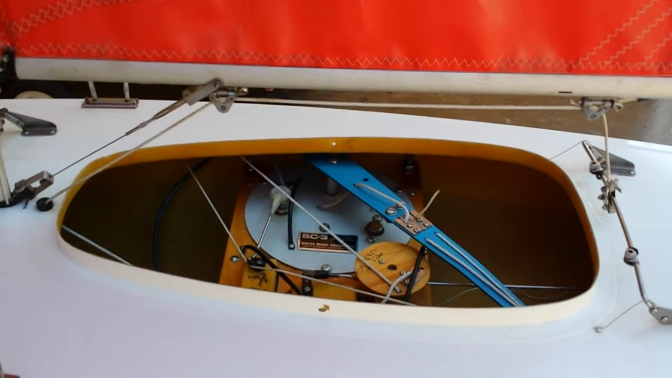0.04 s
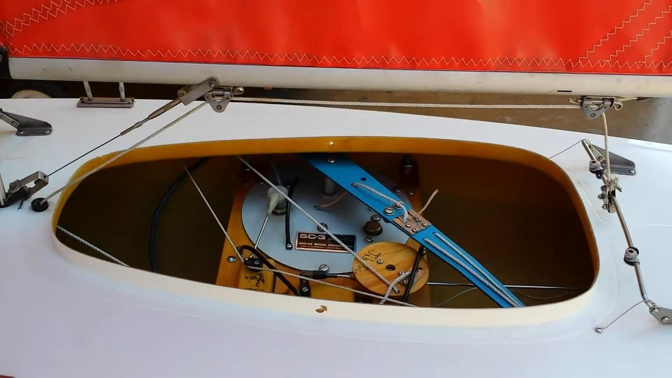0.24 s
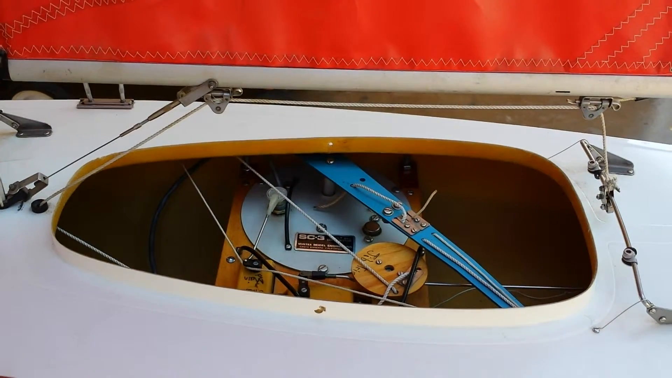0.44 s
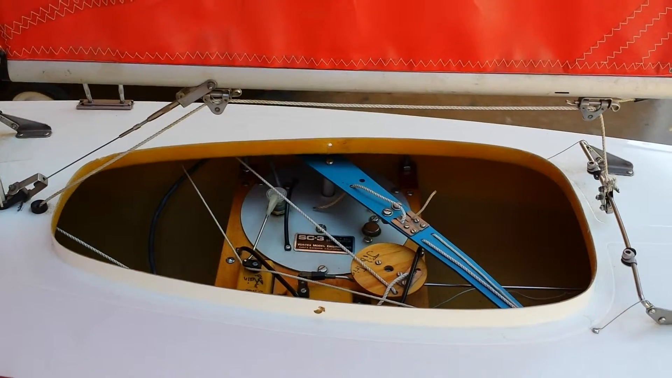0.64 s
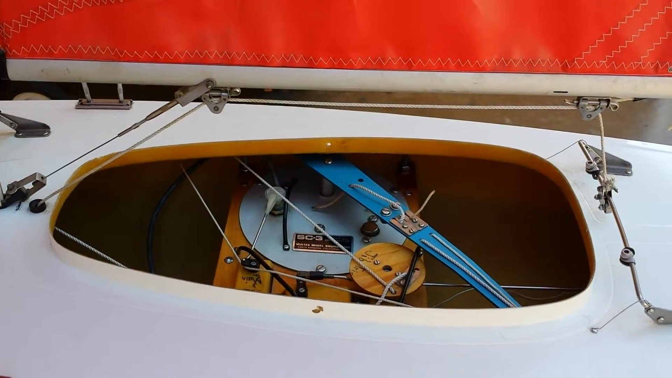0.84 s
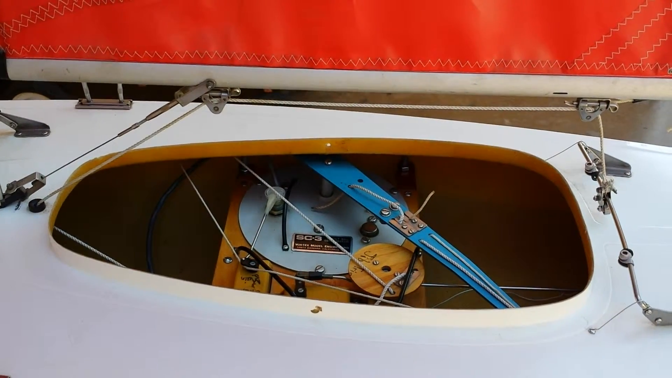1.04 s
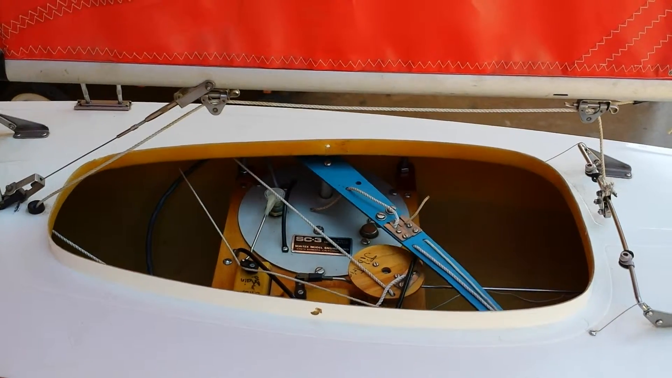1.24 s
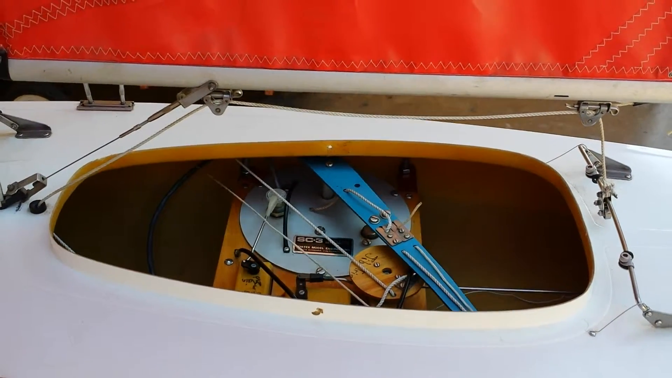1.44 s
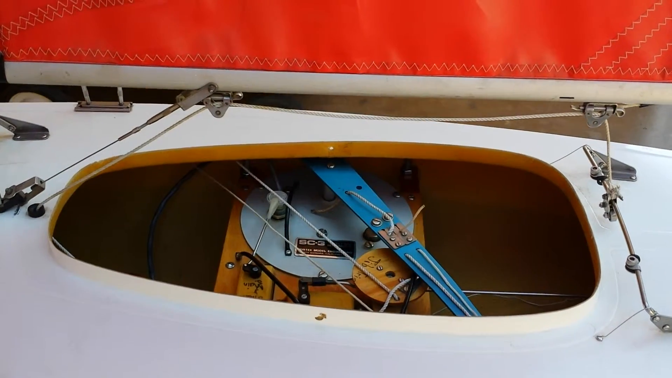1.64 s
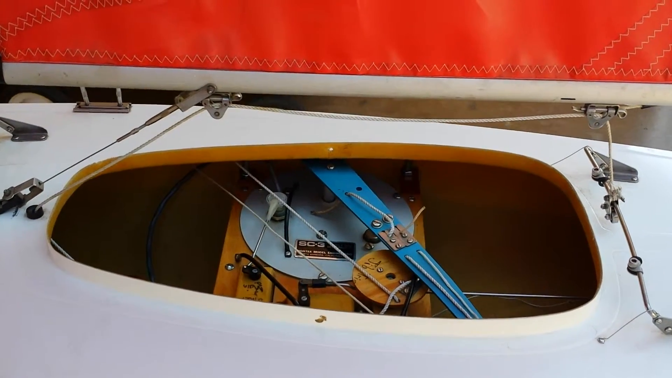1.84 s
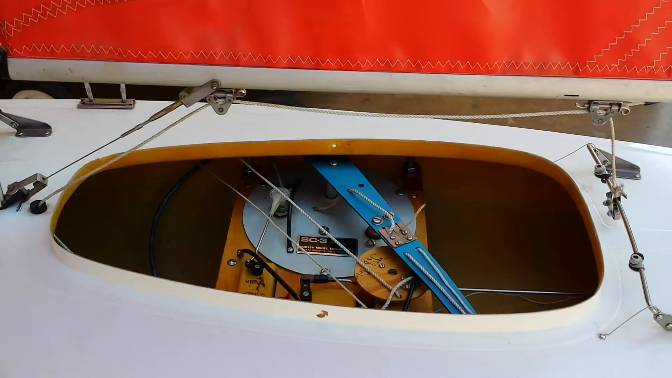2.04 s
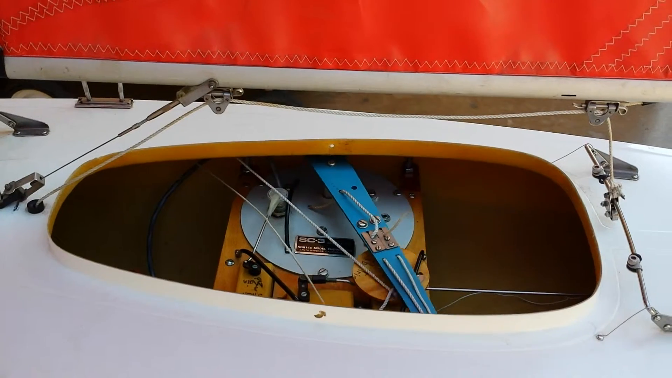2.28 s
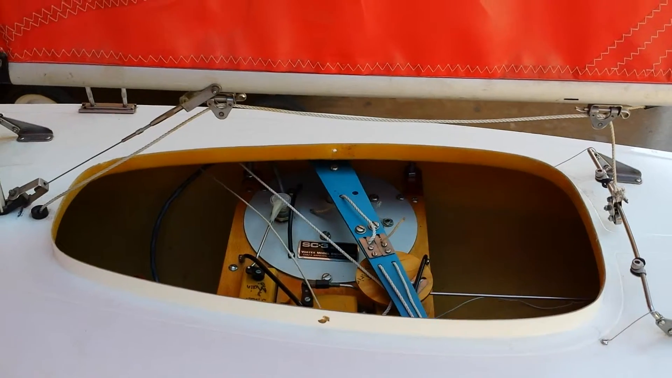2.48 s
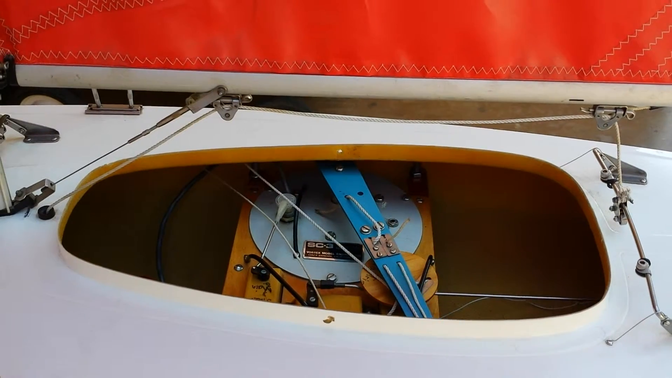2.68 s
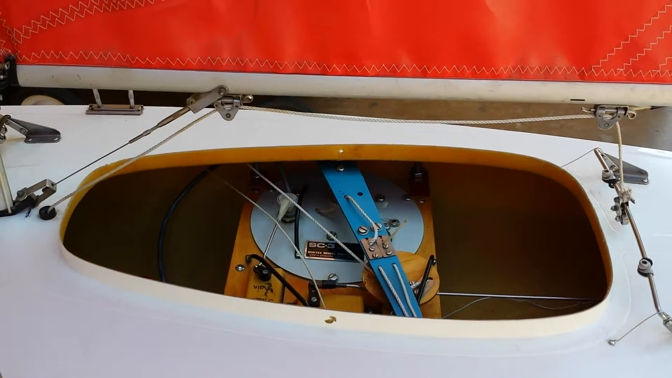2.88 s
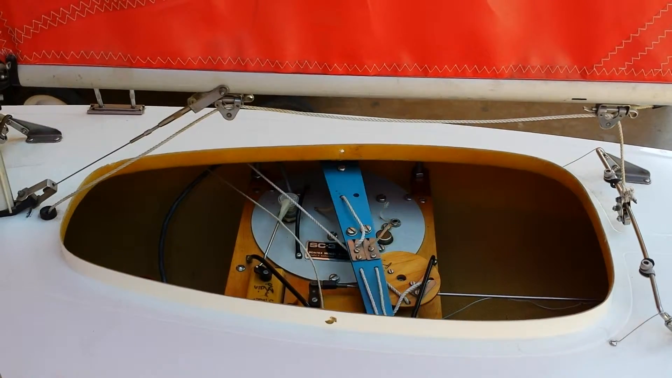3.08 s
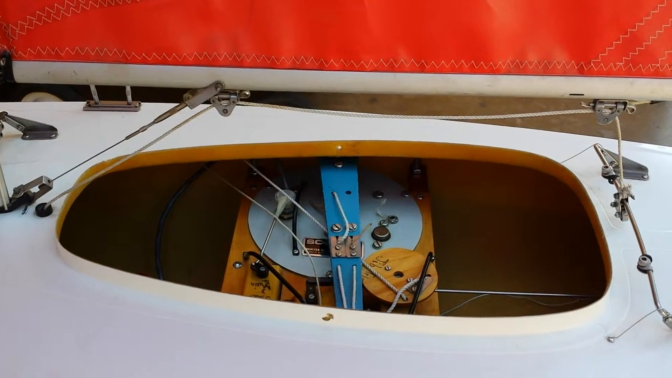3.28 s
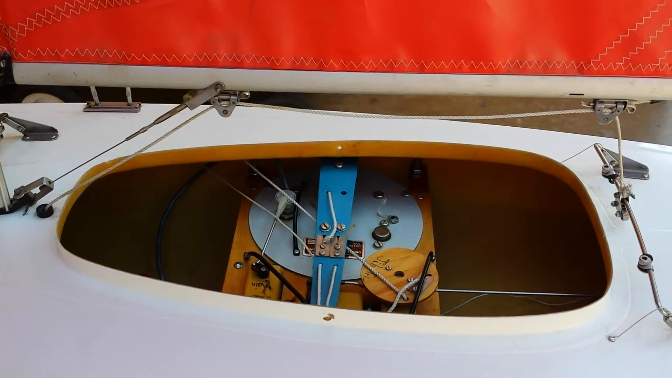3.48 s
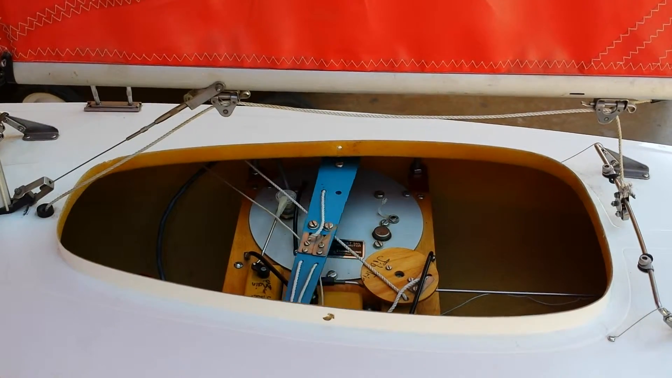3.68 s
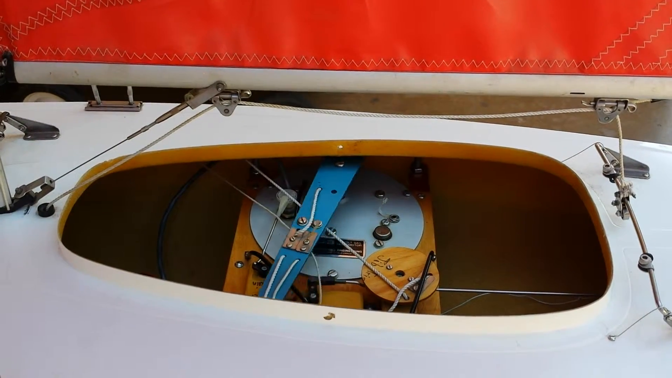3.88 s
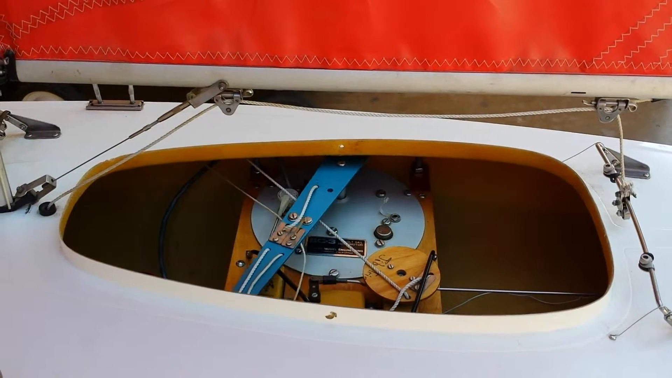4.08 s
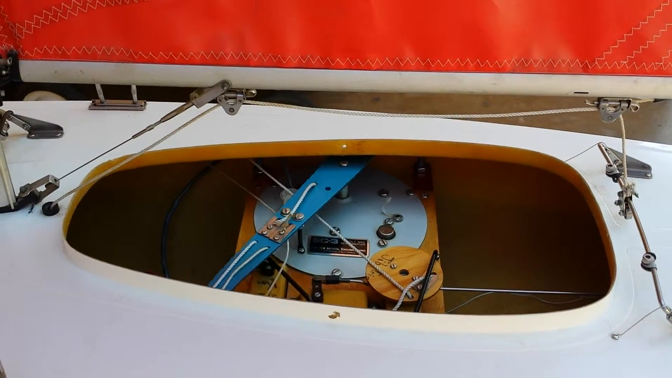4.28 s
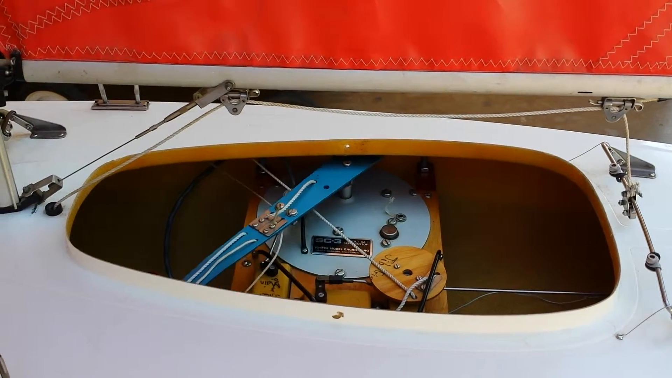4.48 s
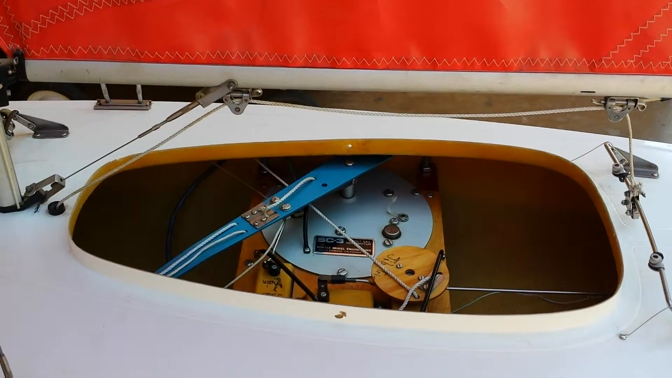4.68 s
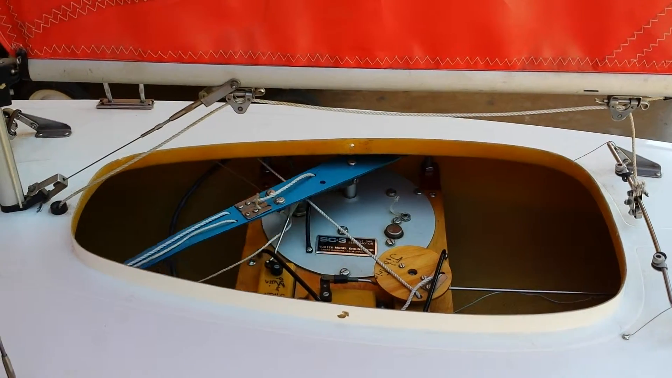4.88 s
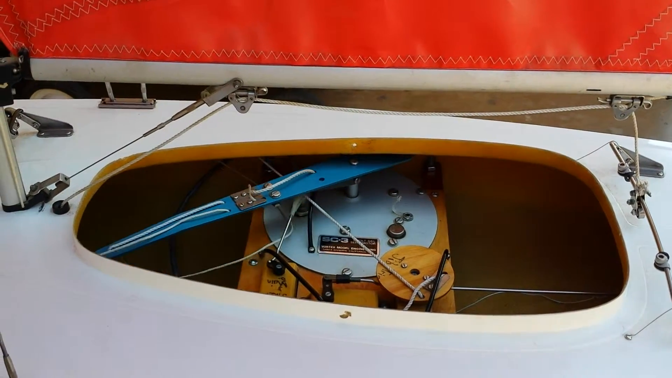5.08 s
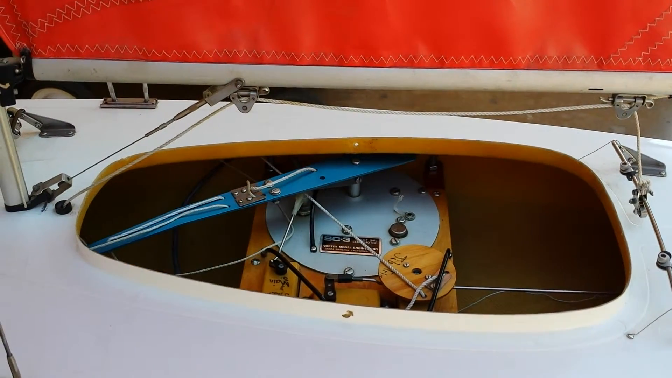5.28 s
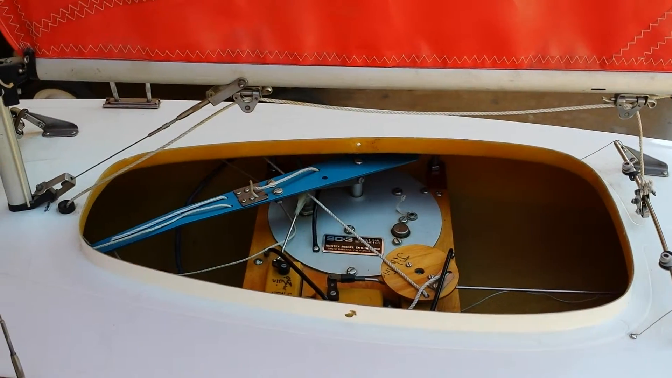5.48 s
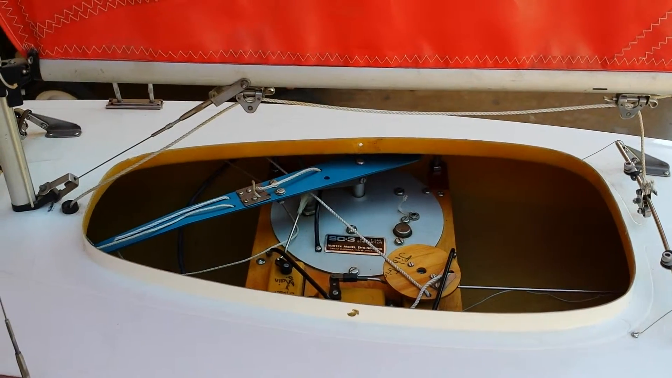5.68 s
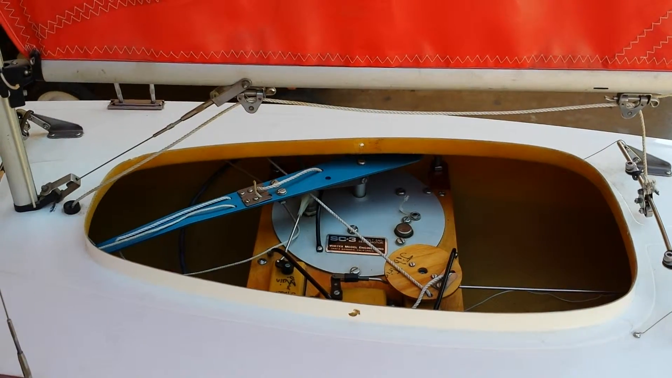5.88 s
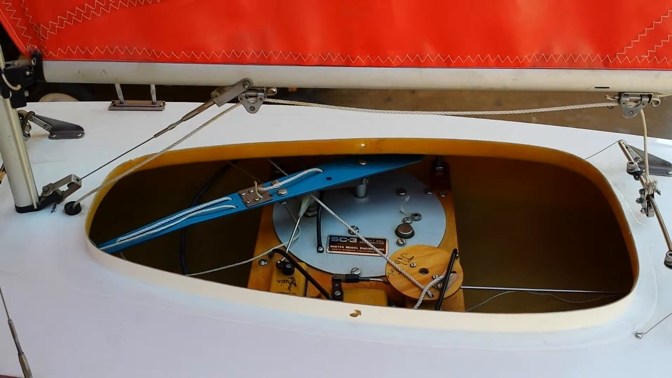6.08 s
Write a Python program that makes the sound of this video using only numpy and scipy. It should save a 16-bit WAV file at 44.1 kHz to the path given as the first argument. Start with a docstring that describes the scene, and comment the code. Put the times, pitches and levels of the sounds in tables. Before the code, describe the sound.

A small geared servo whirs in two short buzzing bursts and one long grinding run, with faint ticks and line rubbing between, in a quiet room.

```python
"""Indoors, inside a model boat, a geared servo swings the sail arm: two short runs and a long one.
Random knocks, one per gear tooth, excite the gearbox and drum on the hollow hull; the motor hums below.
Around the runs single teeth tick and the line rubs and squeaks as bands of swelling noise.
After the last run come a few short scuffs, all over a soft room murmur with a light reverberation."""
import sys
import numpy as np
from scipy import signal
from scipy.fft import rfft, irfft
from scipy.io import wavfile
from scipy.ndimage import uniform_filter1d

SR = 44100
rng = np.random.default_rng(int(sys.argv[2]) if len(sys.argv) > 2 else 0)


def persist_wave(psi):
    """Save psi, clipped to +-1, as 16-bit WAV."""
    counts = np.round(np.clip(psi, -1, 1) * 32767).astype(np.int16)
    wavfile.write(sys.argv[1], SR, np.atleast_2d(counts).T)


N = 270333
TIME = np.arange(N) / SR
FREQ = np.fft.rfftfreq(N, 1 / SR)

# Runs of the servo. Each row: gears bite in seconds, spin-up in seconds, switch-off in seconds,
# run-down in seconds, rattle in dB, tooth edges in dB above the rattle, hum in dB (all before mix trims).
RUNS = [(1.039, 0.092, 1.345, .19, -24.5, -0.4, -39), (1.976, .11, 2.305, .17, -24, 0.5, -40),
        (2.781, 0.093, 5.095, .15, -23.5, 1.0, -38.5)]
SLACK_S = 0.062  # before the gears bite, the motor turns softly through their slack for this long


def gain_of(db):
    """Decibels to gain."""
    return np.exp(np.asarray(db) * np.log(10) / 20)


def evened(x):
    """Scales to rms 1."""
    return x / np.sqrt(np.mean(x ** 2) + 1e-20)


def read(points, hz=FREQ, axis=1):
    """Reads one column of a spectrum on a log-frequency axis."""
    table = np.array(points, float)
    return np.interp(np.log(hz + 1), np.log(table[:, 0] + 1), table[:, axis])


def read_gain(points):
    """A spectrum in dB as gains."""
    return gain_of(read(points))


def level(s, db):
    """A gain curve through points in seconds and dB, silent outside its span."""
    return gain_of(np.interp(TIME, s, db, left=-150, right=-150))


def below(hz, order):
    """Low-pass gain."""
    return 1 / np.sqrt(1 + (FREQ / hz) ** (2 * order))


def above(hz, order):
    """High-pass gain."""
    return np.sqrt(1 - below(hz, order=order) ** 2)


def shaped(x, gain):
    """Filters by a gain for each frequency."""
    return irfft(rfft(x) * gain, N)


def wobble(hz):
    """A random curve of rms 1 that wanders at about this rate."""
    count = int(np.pi * hz * N / SR) + 2
    points = rng.standard_normal(count)
    return evened(np.interp(TIME, np.linspace(0, N / SR, count), points))


def swell(s, half):
    """A stroke that swells to its middle and dies away again."""
    return 1 / (1 + .5 * ((TIME - s) / half) ** 2) ** 4


def scatter(strength):
    """Countless tiny contacts of a given strength, reaching both sides: alike in the bass, diffuse in the treble."""
    # Likeness of the two sides, before the bass is drawn together. Each row: frequency in Hz, likeness 0-1.
    likeness = [(100, 0.74), (350, 0.97), (600, 0.65), (800, 0.86), (1400, 0.73), (2100, 0.3), (2550, 0.56),
                (3100, 0.39), (7500, 0.37), (9000, 0.28), (14000, .15)]
    # Lead of the left side, before the bass is drawn together. Each row: frequency in Hz, phase in radians.
    lead = [(100, 0), (1300, .15), (1750, -.8), (2600, -.9), (3500, -2.7), (4200, -2.7), (4450, -.1),
            (5050, -.1), (5600, -2.6), (6200, -.8), (7300, -2.8), (8100, -.7), (8800, -.4), (9200, -2.2),
            (10700, .3), (12000, -1.5)]
    near, far = rfft(strength * rng.standard_normal((2, N)))
    apart = above(450, order=3)
    same = 1 - apart * (1 - np.clip(read(likeness), 0, 1))
    right = same * near + np.sqrt(1 - same ** 2) * far
    right = right * np.exp(-1j * apart * read(lead))
    return irfft(np.array([near, right]), N)


def room_noise():
    """Murmur of air and distant machines: low coloured noise whose level drifts and wavers."""
    # Colour of the murmur. Each row: frequency in Hz, relative level in dB.
    colour = [(12, -37), (20, -8.5), (42, -15), (116, 3), (185, -5.5), (491, -12), (565, -14),
              (1010, -15.5), (1200, -23), (2030, -24.5), (2400, -28.5), (4310, -29.5), (6910, -30),
              (14300, -35.5), (15500, -37)]
    # Course of the murmur, before it wavers. Each row: time in seconds, level in dB.
    course = [(0, -51), (1.0, -52), (2.6, -52.5), (5.3, -57), (6.13, -59)]
    air = evened(shaped(scatter(1), read_gain(colour)))
    wavering = gain_of(.9 * wobble(4.4))
    return air * level(*np.transpose(course)) * wavering * gain_of([[.5], [-.5]])


def reverberation(x):
    """A diffuse half-second noise tail that decays at its own rate in each band, fastest near 5 kHz."""
    # Decay of the room. Each row: frequency in Hz, time to fall by 60 dB in seconds.
    decay = [(100, 0.37), (1000, 0.58), (5000, 0.083), (14000, 0.31)]
    hz, t, noise = signal.stft(rng.standard_normal((2, SR // 2)), SR, nperseg=256)
    fading = gain_of(-60 * t / read(decay, hz)[:, None])
    late = t > .005  # leaves out the direct sound
    tail = signal.istft(noise * fading * late, SR, nperseg=256)[1]
    return signal.fftconvolve(x, tail / np.linalg.norm(tail[0]), axes=1)[:, :N]


def rubbing(grain_db):
    """Fibres of the line catch and slip: a grainy rasp, each stroke with its own share of treble hiss."""
    # Strokes over deck and rigging. Each row: middle in seconds, half length in seconds,
    # relative level in dB, gain of the treble hiss in dB.
    strokes = [(0.08, .018, -59, -19), (0.248, 0.017, -47, -16), (0.301, 0.018, -45.5, -13),
               (0.383, .022, -51, -24), (0.553, 0.037, -61, 4), (.645, 0.034, -45.5, -11),
               (0.763, 0.028, -60.5, 3), (1.57, 0.051, -63, 7.5), (1.78, .015, -55, 1.5),
               (2.686, 0.068, -56.5, -4.5), (5.518, .058, -46.5, 1), (5.769, 0.037, -44, -7.5),
               (5.822, 0.041, -41, -2), (5.903, 0.017, -48.5, -11), (6.047, .018, -58.5, -2)]
    # Colour of the rasp. Each row: frequency in Hz, relative level in dB.
    colour = [(150, -20), (280, 0), (600, -6), (1100, -8), (1450, -3), (1900, -2), (2450, -6), (3000, -5),
              (3700, -6), (4900, -3.5), (6900, -1), (8500, -15.5), (11000, -23), (15000, -45.5)]
    rasp = scatter(gain_of(grain_db * wobble(250)))
    rasp = evened(shaped(rasp, read_gain(colour)))
    dull = shaped(rasp, below(3100, order=6) ** 2)
    hiss = rasp - dull
    # the taut line keeps rasping faintly and unevenly for the first two seconds
    creep = gain_of(-65 + 3.5 * wobble(12)) * (TIME < 2)
    dull_gain, hiss_gain = creep, creep * gain_of(-14.5)
    for s, half, db, hiss_db in strokes:
        stroke = swell(s, half)
        dull_gain = dull_gain + gain_of(db) * stroke
        hiss_gain = hiss_gain + gain_of(db + hiss_db) * stroke
    return (dull * dull_gain + hiss * hiss_gain) * gain_of([[5.5], [2]])


def squeaks(hz):
    """The line sticks and slips in an eyelet, which rings faintly in one band."""
    # Squeaks. Each row: middle in seconds, half length in seconds, relative level in dB.
    strokes = [(0.299, 0.011, -47), (0.64, 0.033, -54), (1.662, 0.0089, -47), (2.68, 0.031, -59),
               (5.523, 0.042, -46.5)]
    band = 1 / (1 + ((FREQ - hz) / 300) ** 2) ** 2
    ring = evened(shaped(scatter(1), band))
    strength = sum(gain_of(db) * swell(s, half) for s, half, db in strokes)
    return ring * strength * gain_of([[2], [-1]])


def ticks(ring_s, tick_db):
    """A tooth drops into the play of the next one: a short plastic click of decaying noise."""
    # Single teeth slipping. Each row: time in seconds, relative level in dB.
    slips = [(0.4475, -39.5), (0.5163, -40), (0.5324, -38.5), (0.5714, -40), (0.6005, -43), (0.621, -42),
             (0.7907, -41.5), (0.834, -42), (0.902, -41), (0.929, -44), (1.549, -38), (1.5767, -42),
             (1.6317, -43), (1.659, -40.5), (1.715, -44), (1.7549, -44), (1.865, -42), (2.596, -45.5),
             (5.4075, -43.5), (5.7023, -47.5), (6.0327, -48)]
    # Colour of the click. Each row: frequency in Hz, relative level in dB.
    colour = [(300, -26.5), (1200, -5), (2500, 2), (3500, -4.5), (4800, -2), (7200, 1), (9500, -17),
              (15000, -33)]
    s, db = np.transpose(slips)
    blows = np.bincount(np.round(s * SR).astype(int), gain_of(db + tick_db), N)
    force = signal.lfilter([1], [1, -np.exp(-1 / (ring_s * SR))], blows + 1e-12)
    return shaped(scatter(force), evened(read_gain(colour))) * gain_of([[1.2], [-1.2]])


def shaft_turns():
    """Turns of the motor shaft: it speeds up while switched on, sinks back after, and is slightly unsteady."""
    idle_hz, full_hz, speed_up_s = 101.54, 115.1, .16  # speed_up_s is a time constant
    powered = sum((TIME > bite - SLACK_S) & (TIME < off) for bite, _, off, *_ in RUNS)
    keep = np.exp(-1 / (speed_up_s * SR))
    hz = idle_hz + (full_hz - idle_hz) * signal.lfilter([1 - keep], [1, -keep], powered)
    return np.cumsum(hz * (1 + .006 * wobble(12))) / SR


def run_gain(bite, spin_s, off, down_s, shape):
    """Envelope of one run: slack, a step as the gears bite, spin-up, hold, run-down."""
    spin_curve = 1.21  # power by which the spin-up levels off
    coast_s = 0.011  # rounds the switch-off
    slack_db, bite_db, fade_db = shape
    slack = gain_of(slack_db) * np.clip((TIME - bite + SLACK_S) / 0.013, 0, 1)
    unspun = np.clip(1 - (TIME - bite) / spin_s, 0, 1)
    coasted = (np.hypot(np.maximum(TIME - off, 0), coast_s) - coast_s) / down_s
    engaged = gain_of(bite_db * unspun ** spin_curve - fade_db * coasted)
    return np.where(TIME < bite, slack, engaged)


def hum_gain():
    """Strength of the hum: faint around the early runs, building slowly in each and growing with the load."""
    # Faint hum of the idling motor. Each row: time in seconds, level in dB.
    idle = [(0, -53), (.2, -53.5), (.45, -47), (.95, -56.5), (1.58, -46), (1.9, -59), (2.5, -56),
            (2.9, -64)]
    # How the hum follows a run: dB in the slack, dB as the gears bite, dB lost over the run-down time.
    shape = (-30, -15.5, 22)
    growth_db = 2.5  # dB per second as the arm takes up load
    running = np.zeros(N)
    for bite, spin_s, off, down_s, _, _, db in RUNS:
        load_db = growth_db * (np.clip(TIME, bite, off) - bite)
        # the hum builds more slowly than the gears spin up
        running += gain_of(db + load_db) * run_gain(bite, 2.3 * spin_s, off, down_s, shape)
    return np.hypot(running, level(*np.transpose(idle)))


def motor(turns):
    """The unbalanced rotor shakes the hull once a turn; the hum flutters most when it is faint."""
    strength = hum_gain()
    flutter = .1 + .7 / (1 + (strength / gain_of(-45)) ** 2)
    unsteady = (1 + flutter * (wobble(17) + 1j * wobble(19))) / np.sqrt(1 + 2 * flutter ** 2)
    tone = (np.exp(2j * np.pi * turns) * unsteady).real
    overtone = gain_of(-20.0) * np.sin(2 * np.pi * turns * 4)
    return np.sqrt(2) * strength * (tone + overtone) * gain_of([[0], [-.6]])


def hull():
    """Response of gearbox and hull towards each side: resonant peaks over a body with roughened treble."""
    # Dense resonances between the modes. Each row: frequency in Hz, left and right relative level in dB.
    dense = [(130, -29, -30), (440, -29, -29), (700, -22, -25), (1500, -15, -23), (2100, -14, -19),
             (2700, -17, -26), (3100, -15, -20), (4700, -23, -22), (7500, -11, -17), (9000, -16, -14),
             (10600, -22, -21), (11900, -22, -19), (12800, -35, -24), (15000, -30, -30)]
    # Air and panel resonances of the hull. Each row: frequency in Hz, width in Hz before it is
    # narrowed below, left and right relative level in dB.
    hull_modes = [(134, 10, -17, -18), (171, 11, -11.5, -12.5), (205, 11, -0.5, -0.5), (241, 9, -4, -6),
                  (264, 20, 0, -2), (327, 18, -10, -11), (345, 19, -8, -9), (372, 17, -13, -12),
                  (399, 14, -10, -11), (460, 7, -16, -18), (487, 25, -18, -21), (518, 15, -21, -19),
                  (589, 36, -18, -25), (766, 42, -16, -20), (843, 39, -14, -19), (921, 31, -17, -20),
                  (1089, 35, -14, -17)]
    # Resonances of the gears and their case. Each row: as for the hull.
    gearbox_modes = [(1279, 26, -9, -20), (1380, 44, -8, -17), (1462, 88, -10, -18), (1565, 23, -13, -24),
                     (1669, 67, -6, -20), (1773, 49, -6, -15), (1896, 113, -12, -18), (2384, 93, -11, -21),
                     (2520, 107, -5, -13), (2641, 140, -17, -15), (2779, 88, -7, -19), (2900, 47, -12, -30),
                     (3350, 110, -15, -21), (4010, 140, -21, -20), (4335, 38, -23, -24),
                     (6675, 61, -17, -15), (6970, 90, -15, -16), (7240, 140, -10, -17),
                     (7487, 132, -8, -12), (7839, 35, -8, -21), (8180, 95, -11, -18), (8490, 140, -17, -10),
                     (8753, 92, -8, -6), (9011, 125, -9, -11), (9281, 52, -14, -19), (9515, 68, -22, -17),
                     (9797, 47, -17, -18), (10865, 71, -24, -23)]
    grid = np.fft.rfftfreq(32768, 1 / SR)
    # a fine random ripple roughens the treble of the response
    roughness = evened(rfft(rng.standard_normal((2, 512)), 32768).real)
    ripple = gain_of(1.5 * roughness * (grid > 3200))
    smooth = gain_of([read(dense, grid, axis=1), read(dense, grid, axis=2)])
    power = (smooth * ripple) ** 2
    for hz, width, left_db, right_db in list(hull_modes) + list(gearbox_modes):
        peak = 1 / (1 + ((grid - hz) / (.78 * width)) ** 2)
        power = power + (gain_of([[left_db], [right_db]]) * peak) ** 2
    response = np.array([np.interp(FREQ, grid, side) for side in np.sqrt(power)])
    return response * above(97, order=4)


def teeth(turns, count, spread_db, ring_s, sliding, lurch_db):
    """One knock a tooth, of random force, over steady sliding; the play in the gears makes them come in clumps."""
    meshing = np.diff(np.floor(turns * count + .3 * wobble(400)), prepend=0) > 0
    knocks = meshing * gain_of(spread_db * np.minimum(rng.standard_normal(N), 2))
    energy = signal.lfilter([1], [1, -np.exp(-2 / (ring_s * SR))], knocks ** 2)
    return np.sqrt(energy / energy.mean() + sliding) * gain_of(lurch_db * wobble(30))


def pinion(turns, hz, ring_s, spread_db):
    """About once a turn the pinion slaps across its play and rings briefly."""
    slaps = np.diff(np.floor(turns + .4 * wobble(60)), prepend=0) > 0
    force = slaps * gain_of(spread_db * np.minimum(rng.standard_normal(N), 2))
    age = TIME[:SR // 20]
    envelope = np.exp(-age / ring_s) * (1 - np.exp(-age / .0004))
    ring = np.sin(2 * np.pi * hz * age) * envelope
    return evened(signal.fftconvolve(force, ring)[:N])


def gear_gains():
    """Strength of hull drumming, rattle and tooth edges through the runs and their jolts."""
    # How each layer follows a run: dB in the slack, dB as the gears bite, dB lost over the run-down time.
    drum_shape = (-33.5, -24, 23.1)
    rattle_shape = (-22, -11, 33)
    edge_shape = (-32.5, -19.5, 51)
    # Jolts as the gears catch or stop and cross their play. Each row: start in seconds,
    # rattle in dB, tooth edges in dB above the rattle (before mix trims).
    jolts = [(1.412, -27, -0.5), (2.029, -27, 5.5), (2.316, -30.5, 2), (2.833, -32, 9), (3.683, -24, 5),
             (4.797, -24, 2.5), (5.156, -33.5, 3)]
    drum_db, drum_lag_s = -4.0, .006  # the hull drums relative to the rattle, slightly late
    jolt_s = .02  # decay time constant
    drum, rattle, edges = np.zeros((3, N))
    for bite, spin_s, off, down_s, db, edge_db, _ in RUNS:
        drum += gain_of(db + drum_db) * run_gain(bite + drum_lag_s, spin_s, off, down_s, drum_shape)
        rattle += gain_of(db) * run_gain(bite, spin_s, off, down_s, rattle_shape)
        edges += gain_of(db + edge_db) * run_gain(bite, spin_s, off, down_s, edge_shape)
    for s, db, edge_db in jolts:
        jolt = gain_of(db) * (TIME > s) * np.exp(-abs(TIME - s) / jolt_s)
        rattle = np.hypot(rattle, jolt)
        edges = np.hypot(edges, jolt * gain_of(edge_db))
    return drum, rattle, edges


def gears(turns):
    """Tooth knocks ring the hull in three bands: drum, rattle and edges; the hardest ones sound brightest."""
    force = teeth(turns, count=9, spread_db=3.5, ring_s=0.0014, sliding=1.0, lurch_db=1.0)
    body = hull()
    drum_band = below(480, order=6)
    edge_band = above(6300, order=8)
    rattle_band = np.sqrt(np.maximum(1 - drum_band ** 2 - edge_band ** 2, 0))

    drum = shaped(scatter(force), body * drum_band)
    # evens out the slow random swelling of the drum noise, so that its loudness follows the runs
    drum = drum / np.sqrt(uniform_filter1d((drum ** 2).mean(0), size=5000))
    rattle = evened(shaped(scatter(force), body * rattle_band))
    edges = evened(shaped(scatter(force ** 1.43), body * edge_band))  # the power favours hard knocks
    slap = pinion(turns, hz=8690, ring_s=0.0039, spread_db=15.5)
    edges = edges + slap * gain_of([[-16], [-12]])

    drum_gain, rattle_gain, edge_gain = gear_gains()
    rattle_trim = gain_of(2.5)
    edge_trim = gain_of(2.0 + 0.58 * wobble(15))
    return drum * drum_gain + rattle * rattle_gain * rattle_trim + edges * edge_gain * edge_trim


def scene():
    """The servo in its hull, close by, in a small room."""
    turns = shaft_turns()
    small = rubbing(grain_db=1.5) + squeaks(hz=2444) + ticks(ring_s=0.01, tick_db=-4.5)
    running = gears(turns)
    echo = reverberation(gain_of(-21.0) * running + gain_of(-7.0) * small)
    return running + small + motor(turns) + echo + room_noise()


def record(dry):
    """Rounds off the highest peaks, then removes the treble above 15450 Hz."""
    rounded = dry / (1 + (dry / .8) ** 6) ** (1 / 6)
    lowpass = signal.firwin(511, 15450, window=("kaiser", 9), fs=SR)
    return signal.oaconvolve(rounded, lowpass[None], "same")


dry = scene()
out = record(dry)
persist_wave(out)
```